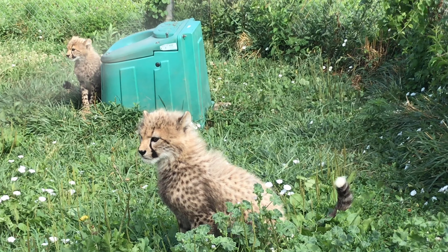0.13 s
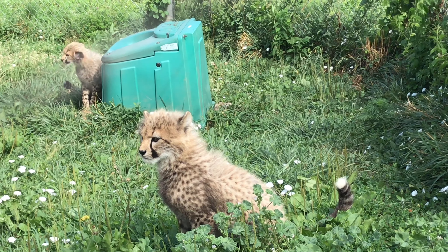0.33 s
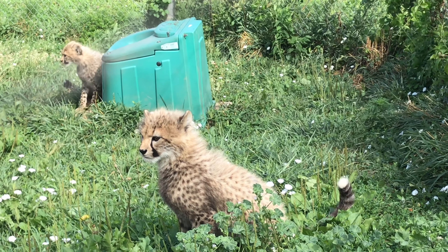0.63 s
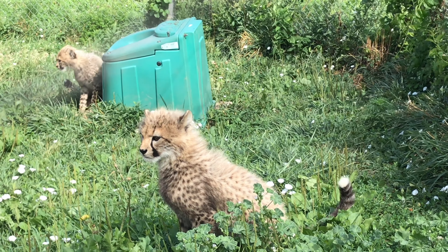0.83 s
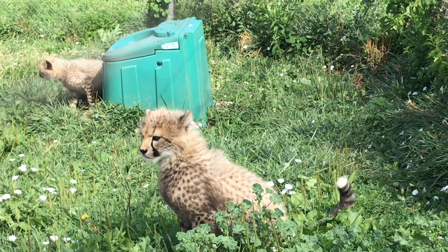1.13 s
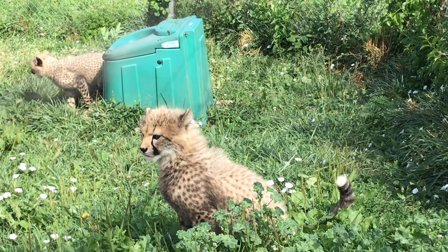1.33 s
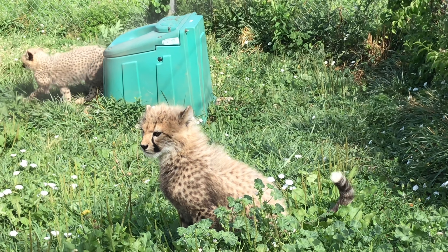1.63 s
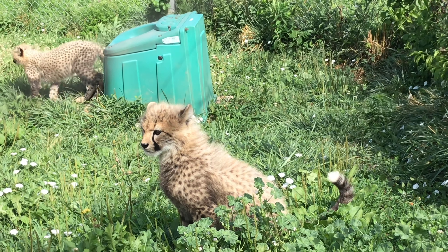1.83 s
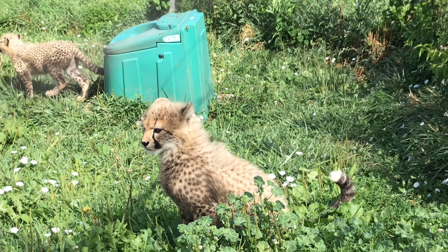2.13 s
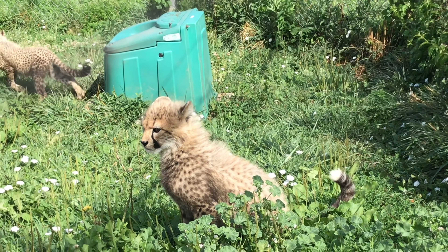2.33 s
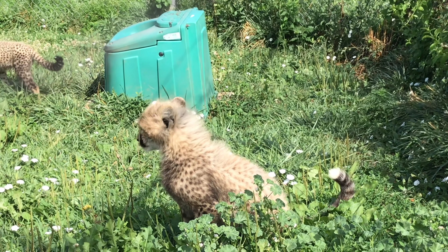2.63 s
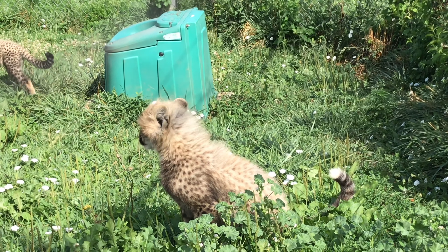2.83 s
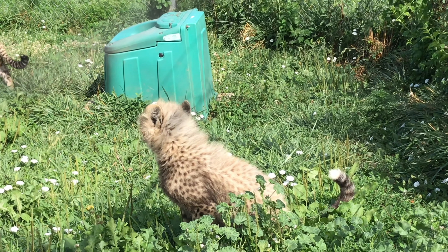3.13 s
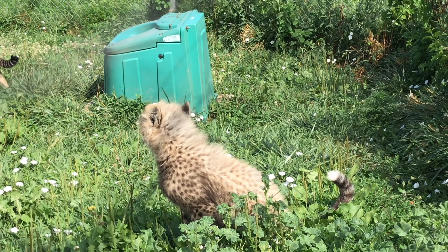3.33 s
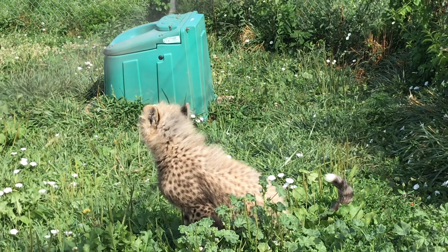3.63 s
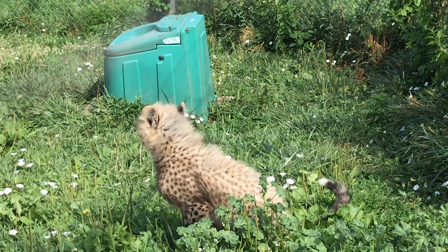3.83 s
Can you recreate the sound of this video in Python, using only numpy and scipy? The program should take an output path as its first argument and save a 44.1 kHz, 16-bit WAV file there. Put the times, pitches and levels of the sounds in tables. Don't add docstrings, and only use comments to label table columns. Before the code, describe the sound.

In a grassy field, a young cheetah makes two stuttering, chirpy churr-to-mew calls and a brief faint third, partly covered by low wind thumps on the microphone, over soft hiss, insects and distant birds.

```python
import sys
import numpy as np
from scipy import signal
from scipy.io import wavfile
from scipy.ndimage import uniform_filter1d

SR = 44100
rng = np.random.default_rng(int(sys.argv[2]) if len(sys.argv) > 2 else 0)


def digitize_waveform(pressure):
    field = np.atleast_2d(pressure).T
    bounded = np.clip(field, -1, 1)
    quanta = np.round(bounded * 32767).astype(np.int16)
    wavfile.write(sys.argv[1], SR, quanta)


def gain_from_db(level_db):
    decades = np.asarray(level_db, float) / 20
    return 10 ** decades


N = 176400


def in_time(rows):
    s, *cols = np.transpose(rows)
    return [np.interp(np.arange(N) / SR, s, c) for c in cols]


def rms_one(x):
    return x / np.sqrt(np.mean(x ** 2) + 1e-20)


def lowpass(x, order, hz):
    return signal.sosfilt(signal.butter(order, hz, fs=SR, output="sos"), x)


def drift(rate):
    r = np.exp(-20 * np.pi * rate / SR)
    slow = signal.lfilter([1], [1, -2 * r, r * r], rng.standard_normal(N // 10 + 4002))[4000:]
    return np.interp(np.arange(N) / 10, np.arange(len(slow)), rms_one(slow))


def resonance(x, hz, width_hz):
    r = np.exp(-np.pi * width_hz / SR)
    poles = [1, -2 * r * np.cos(2 * np.pi * hz / SR), r * r]
    return signal.lfilter([(1 - r * r) / 2, 0, (r * r - 1) / 2], poles, x + 1e-18)


def banded(spectrum, patchy_db, rate, step, lean_db=0):
    hz, db = np.transpose(spectrum)
    octaves = np.arange(0, np.log2(hz[-1] / hz[0]) + step, step)
    edges = np.minimum(hz[0] * 2 ** octaves, SR * 0.45)
    out, shared, white = 0, drift(rate), rng.standard_normal((2, N))
    for k, (low, high) in enumerate(zip(edges, edges[1:])):
        level = np.interp(np.log(low * high) / 2, np.log(hz), db) + lean_db * (k * step - 2)
        band = signal.sosfilt(signal.butter(2, [low, high], "band", fs=SR, output="sos"), white[k % 2])
        flicker = 0.46 * shared + 0.49 * drift(rate)
        out = out + band * gain_from_db(level + patchy_db * flicker)
    return out


def hiss():
    # (frequency [Hz], density [dB per Hz])
    hiss_spectrum = [(6500, -25), (8800, -10.5), (10500, -15.5), (12400, -9.5), (15900, -7)]
    return gain_from_db(-71) * rms_one(banded(hiss_spectrum, patchy_db=4.0, rate=10, step=1 / 8))


def field_murmur():
    # (frequency [Hz], density [dB per Hz])
    field_spectrum = [(220, -2), (350, -3.5), (1700, -14.5), (6500, -17.5), (8000, -26.5)]
    return gain_from_db(-61.5) * rms_one(banded(field_spectrum, patchy_db=0.65, rate=3.4, step=1 / 3))


def birds():
    # (time [s], length [s], start pitch [Hz], end pitch [Hz], level [dB])
    bird_notes = [
        (.275, 0.12, 2803, 2862, -66.5),
        (.472, 0.022, 9100, 8300, -65.5),
        (1.70, 0.029, 8950, 8900, -74),
        (1.735, 0.019, 9050, 8070, -64),
        (2.02, .07, 6520, 6390, -70.5),
        (3.303, 0.014, 8300, 9100, -64.5),
    ]
    # (first note [s], gap [s], start pitch [Hz], end pitch [Hz], level [dB])
    trills = [
        (2.603, .0622, 6704, 7310, -70.5),
        (2.768, 0.057, 5520, 5280, -70.5),
    ]
    rows, out, waver = list(bird_notes), np.zeros(N + SR), drift(220)
    for s, gap, start_hz, end_hz, db in trills:
        for k in range(16):
            rows.append((s + k * gap, 0.014, start_hz, end_hz, db + 2 * rng.standard_normal()))
    for s, length, start_hz, end_hz, db in rows:
        n, first = int(length * SR), int(s * SR)
        warble = 0.025 * (length < 0.03) * waver[first:][:n]
        pitch = np.linspace(start_hz, end_hz, n) * (1 + warble)
        swell = np.sin(np.linspace(0, np.pi, n)) ** 0.59
        out[first:first + n] += gain_from_db(db + 3.0) * swell * np.sin(2 * np.pi * np.cumsum(pitch) / SR)
    return out[:N]


def insects():
    wing_hz = [12500, 14700, 15550]
    when = np.arange(0.0975, N / SR - 0.01, 0.02685)
    luck, out = rng.standard_normal((160, 4))[:len(when)], 0
    at = ((when + 0.0005 * luck[:, 3]) * SR).astype(int)
    for k, hz in enumerate(wing_hz):
        clicks = np.zeros(N)
        clicks[at] = gain_from_db(-53.5 + 16.5 + 1.6 * luck[:, k])
        out = out + resonance(resonance(clicks, hz, 800), hz, 1000)
    return out


def grass_snaps():
    # (time [s], level [dB], length [s])
    snaps = [
        (1.61, -45, 0.00069),
        (2.625, -57.5, 0.032),
        (3.11, -62, 0.0011),
    ]
    t, gate = np.arange(N) / SR, 0
    for s, db, length in snaps:
        gate = gate + gain_from_db(db) * (t > s) * np.exp(-(np.maximum(t - s, 0) / length) ** 2)
    return resonance(gate * rng.standard_normal(N), 10040, 5610)


def wind():
    # (time [s], level [dB])
    strength = [(.1, -56), (.24, -46), (.31, -53), (.58, -57), (.7, -53), (1.2, -49.5), (1.35, -52),
                (2.1, -54.5), (2.55, -56), (2.75, -51.5), (2.9, -49.5), (3.2, -55), (3.42, -45.5),
                (3.52, -40), (3.64, -33.5), (3.74, -41.5), (3.85, -48), (4.0, -53)]
    # (frequency [Hz], density [dB per Hz])
    buffet = [(34, -11), (52, 2), (75, 2.5), (140, -3), (230, -9), (450, -20.5), (900, -94)]
    db, = in_time(strength)
    brighter = 1.3 * (db - db.max()) / 10
    lumps = banded(buffet, patchy_db=8.5, rate=15.9, step=0.508, lean_db=brighter)
    evened = lumps / np.sqrt(uniform_filter1d(lumps ** 2, SR // 11))
    return gain_from_db(db) * evened


def wind_thumps():
    # (time [s], peak level [dB], frequency [Hz])
    thumps = [(0.22, -36, 137), (0.829, -35, 130), (1.167, -31.5, 188), (1.198, -37.5, 260),
              (2.703, -38, 130.3), (2.894, -34, 130), (3.423, -31.5, 225), (3.499, -18.5, 248),
              (3.52, -23.5, 119), (3.545, -26, 166), (3.583, -28.5, 331), (3.612, -20.5, 250),
              (3.617, -27.5, 420), (3.624, -30, 547), (3.648, -23.5, 147.2), (3.67, -32, 129),
              (3.688, -24, 138.4), (3.701, -29, 202), (3.732, -22.5, 149.5), (3.755, -42, 230.6),
              (3.82, -40, 197.6)]
    out = np.zeros(N)
    for s, peak_db, hz in thumps:
        hit = np.zeros(SR // 5)
        hit[0] = gain_from_db(peak_db + 34.5) * 250 / hz
        hit = lowpass(hit, 4, 2 * hz)
        hit = resonance(hit, hz, np.log(1000) / np.pi * hz / 6.2)
        first = int(s * SR)
        out[first:][:len(hit)] += hit[:N - first]
    return out


VEIL_SHARE = 0.68


def hold_mew(hz, gain, tilt, veil, rough):
    # (time [s], pitch [Hz], level [dB], tilt [dB per octave])
    mew = [
        [(1.494, 691, -77, 4), (1.499, 727, -43, -11), (1.515, 781, -47.5, -22), (1.53, 769, -51, -4.5),
         (1.54, 688, -48, -5.5), (1.56, 702, -52.5, -4.5), (1.585, 863, -53, -12)],
        [(1.604, 874, -50.5, -11.5), (1.645, 931, -48.5, -6.5), (1.665, 858, -53, -6), (1.714, 904, -53, -5),
         (1.75, 853, -56, -6), (1.838, 832, -56, -7)],
        [(1.85, 1063, -51, -8.5), (1.875, 1103, -56.5, -15), (1.885, 1060, -54, -10), (1.895, 988, -74, -12)],
    ]
    # (time [s], pitch [Hz], level [dB], tilt [dB per octave])
    later_mews = [
        [(2.583, 781, -98, -38), (2.588, 801, -52.5, -5), (2.612, 840, -44, -10.5), (2.622, 745, -55, -3.5),
         (2.646, 778, -52, -4), (2.66, 771, -56.5, -5), (2.71, 842, -53, -7.5)],
        [(2.722, 910, -56.5, -13.5), (2.76, 961, -51, -8.5), (2.81, 1050, -54, -9), (2.85, 1102, -56, -11),
         (2.928, 1133, -54, -14), (2.962, 1101, -55, -12.5), (2.972, 1009, -55.5, -1.5)],
        [(2.982, 853, -51.5, -13), (3.004, 873, -53, -4), (3.018, 1128, -56.5, -12), (3.045, 934, -57, -14),
         (3.06, 980, -110, -43)],
        [(3.89, 722, -110, 1), (3.91, 747, -59, -17), (3.94, 702, -67, -7), (4.0, 629, -55, -17)],
    ]
    # (time [s], level [dB])
    softness = [(1.52, -7), (1.6, -2), (1.75, -2), (1.83, -5), (2.63, 1), (2.68, -7), (2.78, -2), (2.9, -8),
                (2.96, -22)]
    soft, = in_time(softness)
    for note in np.vstack(mew), np.vstack(later_mews):
        at = slice(int(note[0][0] * SR), int(note[-1][0] * SR))
        pitch, db, lean = [curve[at] for curve in in_time(note)]
        hz[at], gain[at], tilt[at] = pitch, gain_from_db(db), lean
        veil[at] = VEIL_SHARE * 2 * (lean + 2) + soft[at]
        rough[at] = np.clip((860 - pitch) / 250, 0.1, 1)


def pulse_churr(hz, gain, tilt, veil, rough, hum):
    # (closing time [s], length [s], level [dB], top pitch [Hz], tilt [dB per octave])
    churr = [(0.543, 0.015, -35.5, 473.3, -19), (0.595, 0.022, -34, 486.4, -18),
             (0.646, 0.026, -37, 514.4, -17.5), (0.698, 0.028, -39.5, 643.3, -24),
             (0.754, 0.026, -50, 727.6, -5.5), (0.813, 0.029, -48.5, 756, -6.5),
             (0.862, 0.024, -43, 777, -5), (0.92, 0.024, -45, 799.5, -3.5), (0.977, 0.03, -45.5, 804, -5),
             (1.038, 0.029, -42.5, 786, -6.5), (1.097, 0.027, -44.5, 812, -6),
             (1.156, 0.029, -45.5, 839, -3.5), (1.22, 0.034, -44.5, 878, -4.5),
             (1.284, 0.032, -41.5, 813.4, -8), (1.347, 0.034, -40.5, 798, -9),
             (1.404, 0.027, -41.5, 813, -6.5), (1.478, 0.038, -40, 813.5, -8.5)]
    # (closing time [s], length [s], level [dB], top pitch [Hz], tilt [dB per octave])
    later_churrs = [
        (2.264, 0.02, -38, 546, -10),
        (2.313, 0.018, -40.5, 677.3, -5.5),
        (2.374, 0.035, -46.5, 770, -5),
        (2.433, 0.033, -49, 773.6, -4),
        (2.496, 0.033, -47.5, 831.5, -5),
        (2.561, 0.034, -46.5, 822, -4),
        (3.699, 0.0258, -46, 641, -8.5),
        (3.759, 0.025, -49, 760, -9),
        (3.822, 0.035, -54.5, 772, -8),
        (3.88, 0.021, -52, 719, -10),
    ]
    # (time [s], level [dB])
    hum_lead = [(.65, 2), (.72, 6), (.74, 17), (.81, 17), (.84, 0), (1.1, 3), (1.45, 5), (2.3, 4),
                (2.45, 0), (3.6, 0), (3.75, 5)]
    (lead,), before, t = in_time(hum_lead), 500, np.arange(N) / SR
    crest, shut_db = 0.25, 6
    for shut, length, db, top, lean in list(churr) + list(later_churrs):
        scoop = 0.18 * min(top / 800, 1) ** 2 + 1.5 * max(1 - before / top, 0)
        before = top
        at = slice(int((shut - length - 0.01) * SR), int((shut + 0.015) * SR))
        since = t[at] - shut
        u = since / length
        late = np.maximum(since + 0.002, 0) / 0.0045
        shutting = np.minimum(late, 1)
        press = np.exp(-np.abs(since) / 0.0034)
        rise = scoop * np.clip(-u - crest, 0, 1.2) ** 1.3
        fall = 0.3 * np.clip(u + crest, 0, crest) ** 1.5
        hz[at] = top * (1 - rise - fall - 0.22 * np.minimum(late, 1.2))
        opening = 1 / (1 + np.exp(-(since + length) / 0.0024 * 2))
        release = np.exp(-np.maximum(since, 0) / 0.0045)
        gain[at] = gain_from_db(db - 5.5 + 3 * u + shut_db * shutting) * opening * release
        tilt[at] = lean + 1.5 * press
        veiled = -9 * (1 - np.minimum(u, 0)) + VEIL_SHARE * (lean + 5)
        veil[at] = veiled * (1 - press) - shut_db * shutting
        rough[at] = 1
        hum[at] = lead[at] * (-np.minimum(u, 0) * 1.23 - 0.2) - 2 * shut_db * shutting


def vocal_folds():
    hz, tilt = np.full(N, 700.), np.full(N, -10.)
    gain, veil, rough, hum = np.zeros((4, N))
    hold_mew(hz, gain, tilt, veil, rough)
    pulse_churr(hz, gain, tilt, veil, rough, hum)
    unsteady = 1 + 0.009 * drift(39.5) + 0.015 * rough * drift(330)
    phase = 2 * np.pi * np.cumsum(hz * unsteady) / SR
    tone = 0
    for k in range(1, 12):
        db = tilt * np.log2(k) + veil * (k > 2)
        db = db + hum * ((k < 2) - (k == 2) / 2)
        shimmer = 0.8 * min(k, 4) * drift(50)
        tone = tone + gain_from_db(db + shimmer) * np.cos(k * phase)
    grit = gain_from_db(2.6 * rough * drift(127))
    breath = rough * gain_from_db(-16 + tilt) * (1 + np.cos(phase)) * rng.standard_normal(N)
    return gain * grit * (tone + breath)


def cub():
    # (frequency [Hz], width [Hz], level [dB])
    throat = [
        (645, 2470, -6),
        (1642, 213, 12),
        (2820, 555, 8),
        (4660, 1730, 11.5),
    ]
    # (time [s], level [dB])
    mouth_gain = [(.75, 11.5), (.86, 6.5), (.95, 0), (1.1, -7), (1.45, -2.5), (1.55, 6), (1.62, -2.5),
                  (2.3, 11.5), (2.6, 4)]
    # (delay [s], level [dB])
    echoes = [
        (0.012, -18.5),
        (.021, -26),
        (.034, -20),
    ]
    folds, (opening,), voice = vocal_folds(), in_time(mouth_gain), 0
    for k, (hz, width, db) in enumerate(throat):
        sign = 1 if k else -1
        voice = voice + sign * gain_from_db(db + (k == 2) * opening) * resonance(folds, hz, width)
    voice = lowpass(voice, 5, 5060)
    dull = resonance(voice, 2040, 2600)
    return voice + sum(gain_from_db(db) * np.roll(dull, int(s * SR)) for s, db in echoes)


def scene():
    background = hiss() + field_murmur() + birds() + insects() + grass_snaps()
    return (background + wind() + wind_thumps() + cub())[None]


def roll_off(x):
    return signal.sosfilt(signal.butter(12, 15830, fs=SR, output="sos"), x)


def record(dry):
    open_times = [0.071, 0.0825, .093]
    a, b, c = open_times
    when = [a - 0.012, a - 0.01, a - 0.001, a, b - 0.004, b, c - 0.001, c + 0.0029]
    gate = np.interp(np.arange(N) / SR, when, [0, 0.014, 0.0, 1, 0.81, 0.0, 0.03, 0.95])
    top_cut = signal.cheby2(12, 60, 16450, fs=SR, output="sos")
    return roll_off(signal.sosfilt(top_cut, dry * gate))


dry = scene()
out = record(dry)
digitize_waveform(out)
```